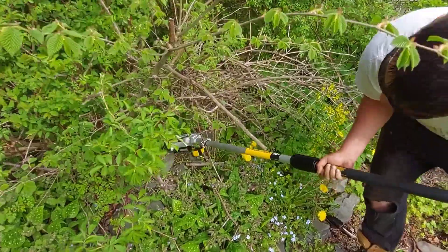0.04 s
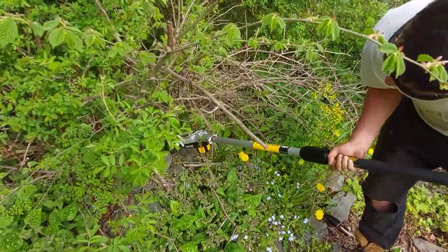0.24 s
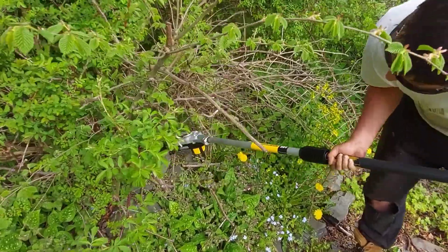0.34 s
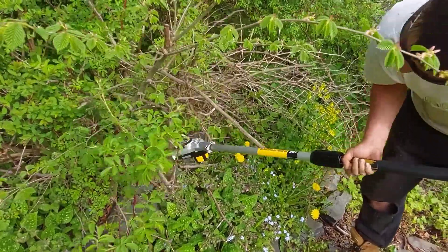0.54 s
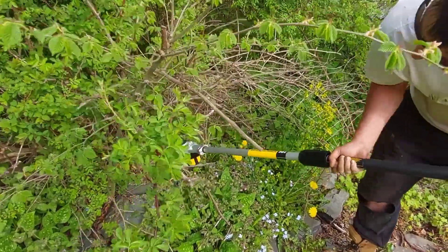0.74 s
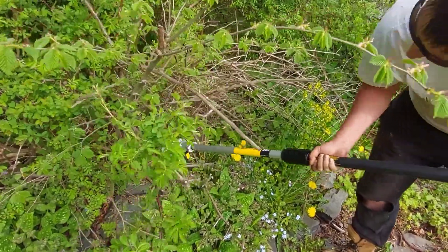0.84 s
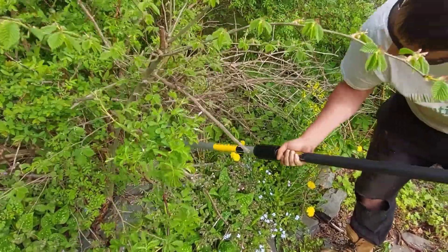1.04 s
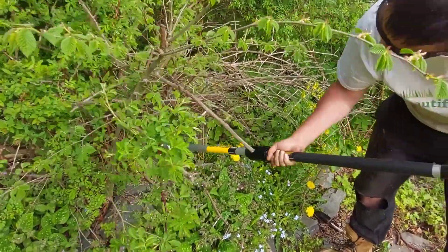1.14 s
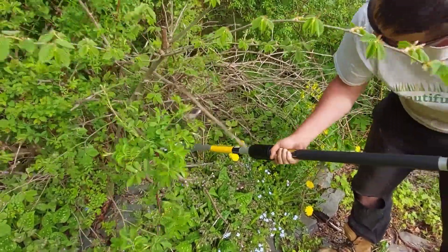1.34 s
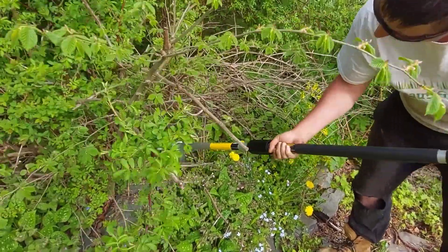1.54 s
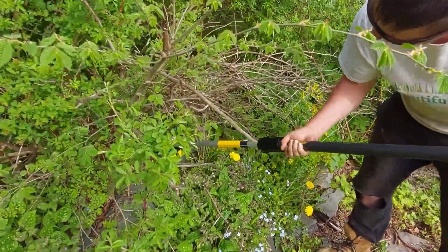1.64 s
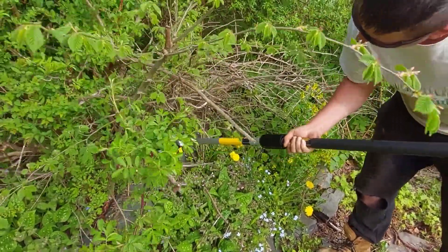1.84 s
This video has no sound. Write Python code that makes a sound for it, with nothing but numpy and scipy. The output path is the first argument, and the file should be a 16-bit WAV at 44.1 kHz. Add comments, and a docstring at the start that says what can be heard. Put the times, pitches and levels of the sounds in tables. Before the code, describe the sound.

A small battery chainsaw on a pole buzzes up, chews a woody stem, then stops outdoors

```python
"""Wind and leaf rustle, then a small battery pole saw spins up in a bush, bites a woody stem and stops.
The chain is random link impacts surging at the tooth rate; bites drive its judder, rasp and chip spray harder.
Motor lines and a gear whine follow the tooth rate; decaying sines ring pole and bar; noise bursts snap twigs.
Leaves are clumped ticks; sines make two far chirps, then a steady ring of metal after the last click.
The open air is coloured noise with a faint steady hum."""
import sys
import numpy as np
from scipy import signal
from scipy.fft import rfft, irfft
from scipy.io import wavfile

SR = 44100
rng = np.random.default_rng(int(sys.argv[2]) if len(sys.argv) > 2 else 0)


def unload_audio(sound):
    """Save the sound as a 16-bit wav file, at the path given as the first command line argument."""
    columns = np.transpose(np.atleast_2d(sound))
    # keep every value between -1 and 1, then stretch to whole-number steps
    steps = np.round(np.clip(columns, -1, 1) * 32767)
    wavfile.write(sys.argv[1], SR, steps.astype(np.int16))


N = 83790
TIME = np.arange(N) / SR  # s
FREQS = np.maximum(np.arange(N // 2 + 1) * SR / N, 1)  # Hz, kept above 0 for logarithms


def from_db(db):
    """Decibels to gain."""
    return 10 ** (np.asarray(db) / 20)


def rms_one(x):
    """Scale to rms 1."""
    return x / np.sqrt(np.mean(x ** 2) + 1e-20)


def in_time(rows):
    """Interpolate each column of a curve at every sample."""
    s, *columns = np.transpose(rows)
    return [np.interp(TIME, s, column) for column in columns]


def over_hz(points):
    """Interpolate a table over log frequency."""
    hz, value = np.transpose(points)
    return np.interp(np.log(FREQS), np.log(hz), value)


def coloured(x, spectrum, band=1):
    """Shape a sound by a spectrum in dB and a band gain; rms 1."""
    gain = from_db(over_hz(spectrum)) * band
    return rms_one(irfft(rfft(x) * gain, N))


def drift(rate_hz):
    """Low-passed noise: slow chance with spread 1."""
    noise = rfft(rng.standard_normal(N))
    return rms_one(irfft(noise / (1 + (FREQS / rate_hz) ** 2), N))


def grains(per_s, spread_db):
    """Random tiny impacts of uneven size and either sign."""
    size_db = spread_db * np.minimum(rng.exponential(1, N), 4)
    sizes = from_db(size_db) * rng.choice([-1, 1], N)
    return sizes * (rng.random(N) < per_s / SR)


RIGHT_LAG_S = .000155


def direct(x):
    """Direct sound reaches the left port first: the right is a delayed copy."""
    lags_s = np.array([[0], [RIGHT_LAG_S]])
    return irfft(rfft(x) * np.exp(-2j * np.pi * FREQS * lags_s), N)


# Share of power scattered by the foliage. Each row: frequency in Hz, share 0-1.
SCATTER_SHARE = [(150, 0.18), (400, 0.2), (1200, 0.073), (2400, 0.67), (3600, 0.9), (6000, 0.97),
                 (10000, 0.69), (14000, 0.1)]
SCATTER_DECAY_S = 0.0046


def scattered(impacts):
    """Impacts arrive partly direct, partly as a short diffuse smear from leaves and ground."""
    share = np.clip(over_hz(SCATTER_SHARE), 0, 1)
    keep = np.exp(-1 / (SCATTER_DECAY_S * SR))
    power = signal.lfilter([1 - keep], [1, -keep], impacts ** 2 + 1e-18)
    smear = np.sqrt(power) * rng.standard_normal((2, N))
    direct_part = rfft(direct(impacts)) * np.sqrt(1 - share)
    return irfft(direct_part + rfft(smear) * np.sqrt(share), N)


# Spectrum of the open air. Each row: frequency in Hz, relative level in dB.
AIR_COLOUR = [(30, -11), (100, 13.5), (220, 10.5), (420, 8), (650, -8), (1500, -28.5), (4000, -36),
              (15000, -96)]
AIR_DB = -53.5
FAR_HUM_HZ, FAR_HUM_DB = 222.6, -63


def open_air():
    """Coloured noise, partly diffuse, plus a faint steady hum far away."""
    air = from_db(AIR_DB) * coloured(scattered(rng.standard_normal(N)), AIR_COLOUR)
    return air + from_db(FAR_HUM_DB) * np.sin(2 * np.pi * FAR_HUM_HZ * TIME)


# Wind level. Each row: time in seconds, level in dB before the offset of each port.
WIND_LEVEL = [(0, -33), (.08, -37), (.13, -33.5), (.19, -37), (.31, -32), (.36, -39), (.6, -46),
              (.8, -49.5), (1.25, -82), (1.38, -38.5), (1.43, -58), (1.78, -59.5), (1.86, -43), (1.9, -61)]
# Wind spectrum. Each row: frequency in Hz, relative level in dB.
WIND_COLOUR = [(20, -49), (45, -5), (72, -0.5), (130, -6.5), (220, -21.5), (600, -39), (2000, -54)]


def wind(left_db=1, right_db=-8):
    """Wind on the microphone: low-heavy noise, independent in each port."""
    rumble = coloured(rng.standard_normal((2, N)), WIND_COLOUR)
    return from_db(in_time(WIND_LEVEL)[0]) * rumble * from_db([[left_db], [right_db]])


# Faint whistles: two far chirps, then a steady ring of metal after the last click.
# Each row: start in seconds, length in seconds, start in Hz, end in Hz, level in dB.
WHISTLES = [(1.48, .11, 4150, 3850, -60), (1.595, .085, 4500, 5900, -57), (1.81, .13, 3490, 3450, -62)]


def whistles():
    """Sines between two pitches with a slight waver, each under a half-sine envelope."""
    out = np.zeros(N)
    for start_s, length_s, start_hz, end_hz, db in WHISTLES:
        part = np.clip((TIME - start_s) / length_s, 0, 1)
        glide_hz = start_hz + (end_hz - start_hz) * part
        hz = glide_hz * (1 + 0.002 * drift(60))
        out += from_db(db) * np.sin(np.pi * part) * np.sin(2 * np.pi * np.cumsum(hz) / SR)
    return out


# Leaves dragging along the bar. Each row: time in seconds, level in dB.
RUSTLE = [(0, -46.5), (.04, -52), (.11, -56.5), (1.45, -51), (1.61, -61), (1.635, -48), (1.69, -49.5),
          (1.71, -44.5), (1.73, -45), (1.748, -43.5), (1.78, -51.5), (1.83, -54.5), (1.9, -61.5)]
# Leaf spectrum. Each row: frequency in Hz, relative level in dB.
LEAF_COLOUR = [(300, -4), (800, -6.5), (2300, -1.5), (3200, -5.5), (5200, 3.5), (7000, -3), (10000, -3.5),
               (15000, -1)]


def leaves():
    """Clumps of fine ticks as leaves slide over the bar."""
    clumps = from_db(2 * drift(60))
    ticks = scattered(grains(per_s=5000, spread_db=3) * clumps)
    return from_db(in_time(RUSTLE)[0]) * coloured(ticks, LEAF_COLOUR)


# Twig snaps. Each row: start in seconds, level in dB, decay in seconds.
SNAPS = [(0.019, -46, 0.0035), (0.119, -43, 0.0027), (.153, -47, 0.0027), (0.3123, -8, 0.0027),
         (1.508, -46, .003), (1.81, -36, 0.0047)]
# Twig spectrum. Each row: frequency in Hz, relative level in dB.
TWIG_COLOUR = [(300, -39), (1500, -55), (3300, -8), (4800, -1.5), (6200, 0.5), (7500, 0), (9500, -2),
               (12000, -4), (15500, -4)]


def twigs():
    """Each snap is a noise burst of breaking fibres that dies in milliseconds."""
    envelope = np.zeros(N)
    for start_s, db, decay_s in SNAPS:
        envelope += from_db(db) * (TIME >= start_s) * np.exp(-np.abs(TIME - start_s) / decay_s)
    return envelope * coloured(scattered(rng.standard_normal(N)), TWIG_COLOUR)


# Pole and bar rings as the chain snags. Each row: start in seconds, pitch in Hz, level in dB, decay in seconds.
KNOCKS = [(0.567, 413, -30.5, 0.019), (0.973, 426, -28, 0.0099), (1.062, 143.5, -27, 0.024),
          (1.188, 346.5, -25, 0.016), (1.327, 171, -23.5, 0.0098), (1.358, 1175, -25.5, 0.025)]
KNOCK_ATTACK_S = .004


def pole():
    """Short rings of pole and bar: sines that decay exponentially."""
    out = np.zeros(N)
    for start_s, hz, db, decay_s in KNOCKS:
        age = np.maximum(TIME - start_s, 0)
        envelope = np.minimum(age / KNOCK_ATTACK_S, 1) * np.exp(-age / decay_s)
        out += from_db(db) * envelope * np.sin(2 * np.pi * hz * age)
    return out


# Drive teeth, sagging under load. Each row: time in seconds, tooth rate in Hz before waver.
SPEED = [(.11, 90), (.2, 125), (.3, 165), (.375, 198), (.405, 211), (.43, 228), (.53, 290), (.62, 283),
         (.67, 283), (.74, 300), (.87, 305), (1.0, 302), (1.08, 245), (1.15, 270), (1.2, 201), (1.25, 210),
         (1.29, 225), (1.42, 205)]
MOTOR_WAVER, MOTOR_WAVER_HZ = 0.00325, 23.8  # spread as a share of the speed, rate


def tooth_rate():
    """Tooth rate in Hz: the speed curve with a small random waver."""
    return in_time(SPEED)[0] * (1 + MOTOR_WAVER * drift(MOTOR_WAVER_HZ))


# Gear whine. Each row: time in seconds, level in dB before throb.
WHINE_LEVEL = [(.11, -100), (.36, -41), (.4, -18), (.418, -16), (.435, -49), (.64, -36.5), (.76, -35),
               (.93, -27.5), (1.0, -32), (1.04, -54), (1.21, -29), (1.255, -15.5), (1.3, -35), (1.4, -52),
               (1.46, -100)]
WHINE_ORDER = 17  # multiple of the tooth rate
SPROCKET_TEETH = 6


def whine(teeth_passed):
    """A high gear tone, roughened by play in the teeth and throbbing with the sprocket."""
    play_rad = .7 * drift(140)
    throb_db = 2 * np.sin(2 * np.pi * teeth_passed / SPROCKET_TEETH) + 2 * drift(150)
    level = from_db(in_time(WHINE_LEVEL)[0] + throb_db)
    return level * np.sqrt(2) * np.sin(2 * np.pi * WHINE_ORDER * teeth_passed + play_rad)


# Running chain. Each row: time in seconds, rattle in relative dB, treble in relative dB.
RUNNING = [(.114, -36, -59), (.123, -17.5, -37), (.16, -8, -19.5), (.22, -6.5, -18), (.25, 0.5, -4),
           (.35, -3, -2), (.42, -2.5, 0.5), (.5, -0.5, 2), (.62, 0.5, 2), (.7, -1, 1.5), (.98, -1, 2),
           (1.13, 3.5, 3.5), (1.31, 0, 2), (1.375, 5.5, -11), (1.405, -4.5, -13.5), (1.44, -14.5, -13.5),
           (1.475, -24.5, -38), (1.6, -41, -43)]
# Colour of bar and housing. Each row: frequency in Hz, relative level in dB.
SAW_COLOUR = [(35, -23.5), (100, -16.5), (200, -16), (420, -9), (630, -20), (830, -10.5), (1180, -6),
              (1550, -4.5), (1950, -5), (2450, -0.5), (3000, -8), (3700, -5), (4700, 1), (6000, -1),
              (8500, -1.5), (10300, 1.5), (12000, -2.5), (13500, -2), (15800, -2.5)]
# Motor and gear lines. Each entry: multiple of the tooth rate.
MOTOR_ORDERS = [1, 2, 3.76, 3.93, 11]
# Same lines. Each entry: relative level in dB.
MOTOR_DB = [-34, -45, -37, -38, -42]
BAR_HZ, BAR_RING_DB = 3610, -34  # ring level relative
FULL_SPEED_HZ = 305


def motor(speed_hz, teeth_passed):
    """Motor and gear lines follow the speed through the housing colour; the bar rings at its own pitch."""
    out = from_db(BAR_RING_DB) * drift(17) * np.sin(2 * np.pi * BAR_HZ * TIME)
    for order, db in zip(MOTOR_ORDERS, MOTOR_DB):
        body_db = np.interp(order * speed_hz, FREQS, over_hz(SAW_COLOUR))
        level = from_db(db + body_db + drift(6.7))
        out = out + np.sqrt(2) * level * np.sin(2 * np.pi * order * teeth_passed)
    return out * from_db(in_time(RUNNING)[0]) * speed_hz / FULL_SPEED_HZ


# Cutters catch wood. Each row: start in seconds, hold end after start in seconds,
# judder in relative dB, rasp in relative dB, spray in relative dB.
BITES = [(0.435, 0.021, 7.5, 0, 0.5), (0.48, 0.028, 5, 1, 4.5), (0.499, 0.042, 12, 0, 1.5),
         (0.562, 0.021, 5, -2, 6.5), (0.584, 0.02, 11, 0, 7.5), (0.639, 0.029, 11, -2.5, 2),
         (1.003, 0.027, 11.5, 3, 7.5), (1.063, 0.022, 13, 10.5, 2.5), (1.076, .018, 0, 6.5, 2.5),
         (1.099, 0.023, 15, 5, -15), (1.159, 0.054, 13.5, 5, 2.5), (1.184, 0.035, 7, 0, -1),
         (1.218, 0.037, 9, -0.5, -14), (1.275, 0.045, 11, 4, -5), (1.311, 0.011, 9, 3, 3),
         (1.332, 0.0093, 14, 3, -4)]
BITE_ATTACK_S, BITE_RELEASE_S = .004, .012


def bite_power():
    """Power that the bites add to judder, rasp and spray: attack, hold, release."""
    power = np.zeros((3, N))
    for start_s, length_s, *dbs in BITES:
        attack = np.clip((TIME - start_s) / BITE_ATTACK_S, 0, 1)
        release = np.exp(-np.maximum(TIME - start_s - length_s, 0) / BITE_RELEASE_S)
        power += (from_db(dbs)[:, None] * attack * release) ** 2
    return power


PATCHY_DB, PATCHY_HZ = 2, 25  # spread and rate of the band levels


def patchy(x, count=24):
    """Rough, patchy rasp: neighbouring narrow bands swell and fade at random."""
    place = np.interp(np.log(FREQS), np.log([700, 7000]), [0, count - 1])
    spectrum = rfft(x)
    out = 0
    for k in range(count):
        band = irfft(spectrum * np.maximum(1 - np.abs(place - k), 0), N)
        out = out + band * from_db(PATCHY_DB * drift(PATCHY_HZ))
    return out


JUDDER_DB, RASP_DB, SPRAY_DB = -48.5, -28.5, -27  # range gains, added to the relative levels
JUDDER_TOP_HZ, RASP_TOP_HZ = 676, 3920
LINK_DEPTH = .3  # share of the impact size
SPROCKET_DB, FLUTTER_DB, FLUTTER_HZ = 0.94, 1.77, 160


def chain(teeth_passed):
    """Links clatter at the tooth rate and surge with each sprocket turn; bites drive three ranges harder."""
    rattle, treble = from_db(in_time(RUNNING))
    running_power = np.array([rattle, rattle, treble]) ** 2
    judder, rasp, spray = np.sqrt(bite_power() + running_power)

    links = 1 + LINK_DEPTH * np.cos(2 * np.pi * teeth_passed)
    sprocket_db = SPROCKET_DB * np.sin(2 * np.pi * teeth_passed / SPROCKET_TEETH)
    surge = links * from_db(sprocket_db + FLUTTER_DB * drift(FLUTTER_HZ))
    impacts = scattered(grains(per_s=16000, spread_db=3.0) * surge)

    low = 1 / (1 + (FREQS / JUDDER_TOP_HZ) ** 8)
    under_treble = 1 / (1 + (FREQS / RASP_TOP_HZ) ** 4)
    return (from_db(JUDDER_DB) * judder * coloured(impacts, SAW_COLOUR, low)
            + from_db(RASP_DB) * rasp * coloured(patchy(impacts), SAW_COLOUR, under_treble - low)
            + from_db(SPRAY_DB) * spray * coloured(impacts, SAW_COLOUR, 1 - under_treble))


# Right side against left. Each row: frequency in Hz, gain in dB.
RIGHT_COLOUR = [(150, -3), (400, 0), (1200, 1), (2400, -6), (3600, -3), (4800, -10), (6000, -14),
                (7300, -2), (8700, -9), (10500, -2), (12500, -2), (15500, -9)]


def scene():
    """The saw and the bush, a little to the left, over the far hum of the open air."""
    speed_hz = tooth_rate()
    teeth_passed = np.cumsum(speed_hz) / SR
    point_sources = motor(speed_hz, teeth_passed) + whine(teeth_passed) + pole() + whistles()
    left, right = open_air() + leaves() + twigs() + chain(teeth_passed) + direct(point_sources)
    right = irfft(rfft(right) * from_db(over_hz(RIGHT_COLOUR)), N)
    return np.array([left, right]) + wind()


CUTOFF_HZ = 16000


def record(dry):
    """Peaks are clipped at full scale, then the top is cut steeply."""
    clipped = np.clip(dry, -1, 1)
    return irfft(rfft(clipped) / np.sqrt(1 + (FREQS / CUTOFF_HZ) ** 240), N)


dry = scene()
out = record(dry)
unload_audio(out)
```